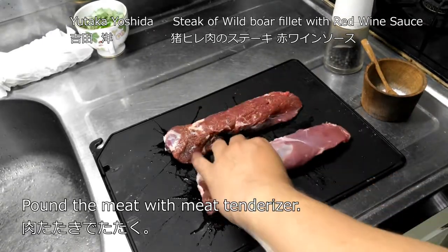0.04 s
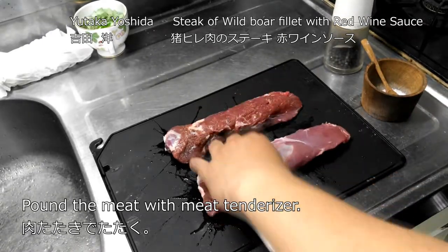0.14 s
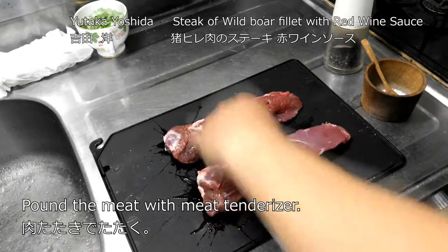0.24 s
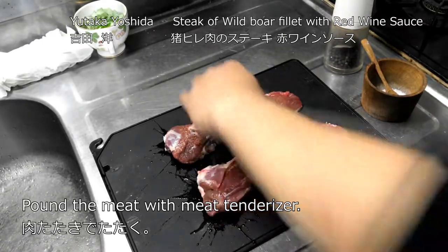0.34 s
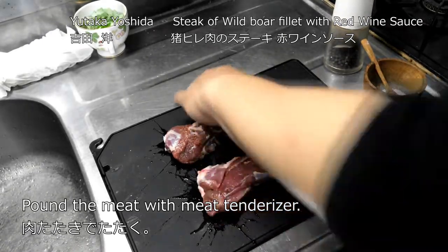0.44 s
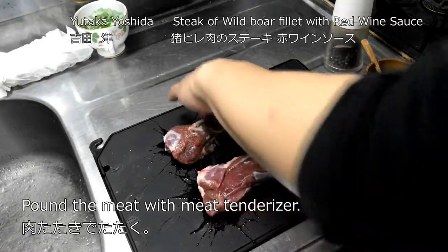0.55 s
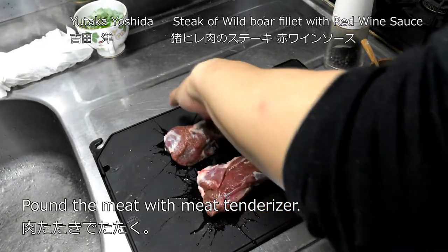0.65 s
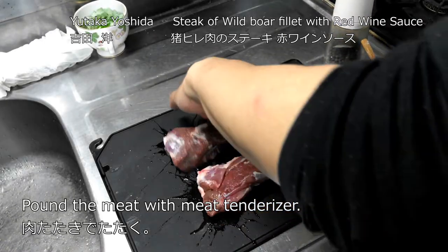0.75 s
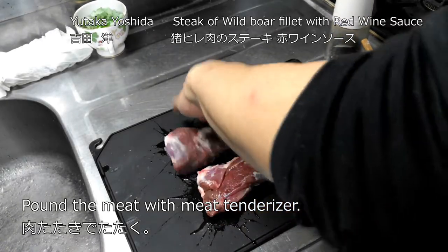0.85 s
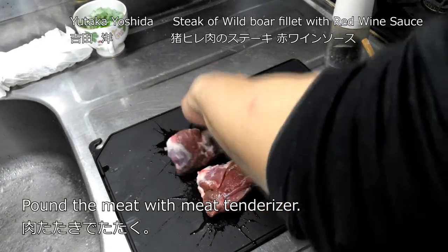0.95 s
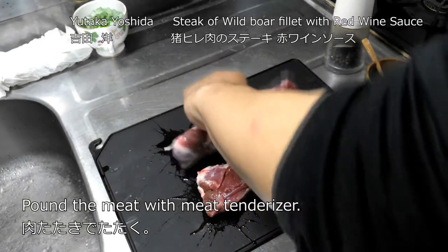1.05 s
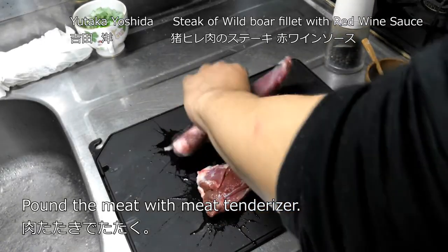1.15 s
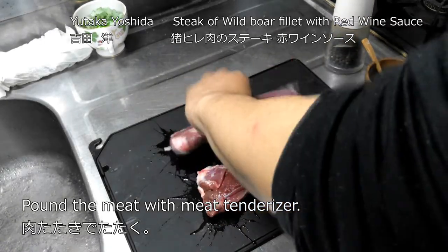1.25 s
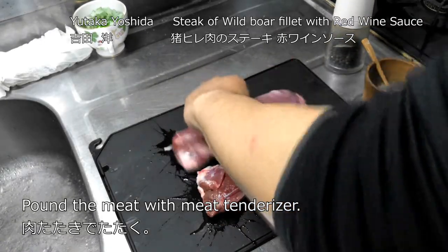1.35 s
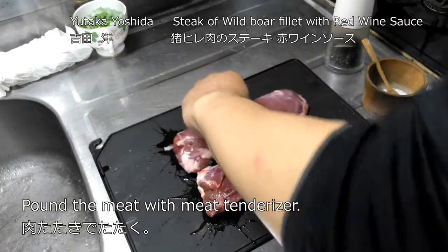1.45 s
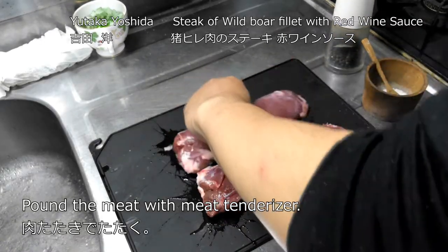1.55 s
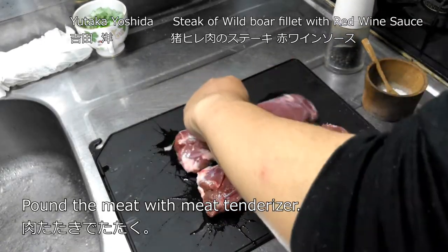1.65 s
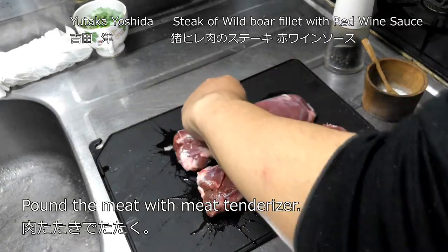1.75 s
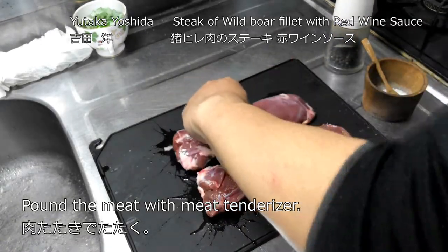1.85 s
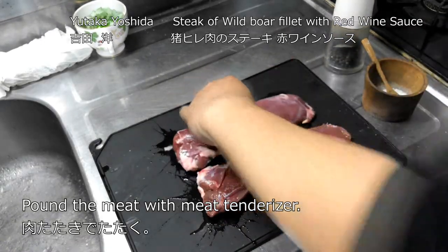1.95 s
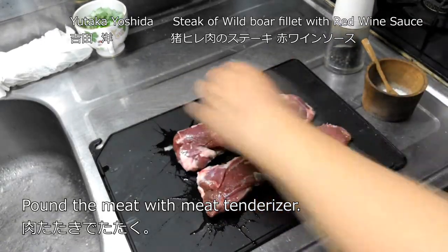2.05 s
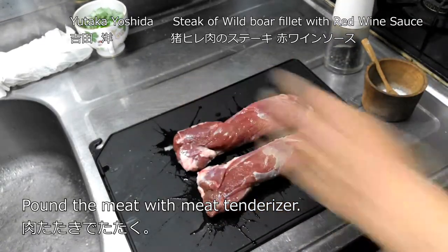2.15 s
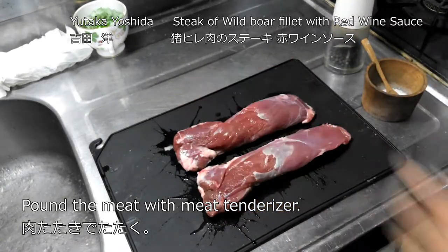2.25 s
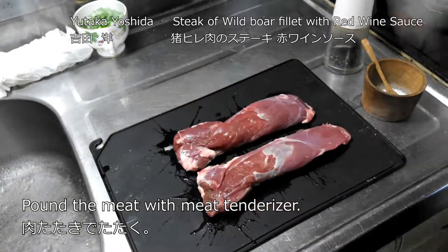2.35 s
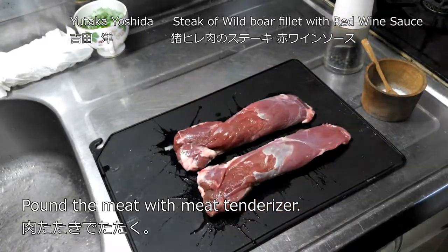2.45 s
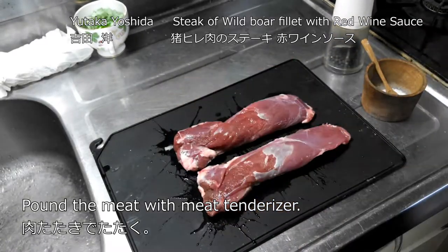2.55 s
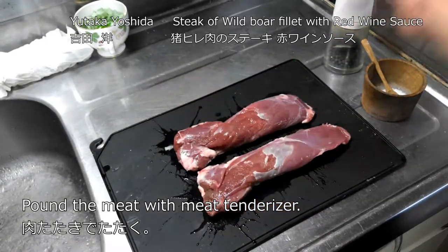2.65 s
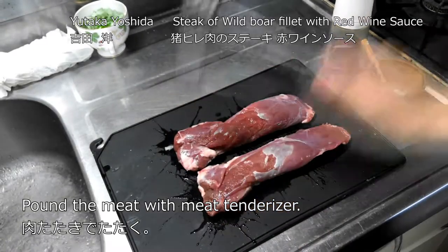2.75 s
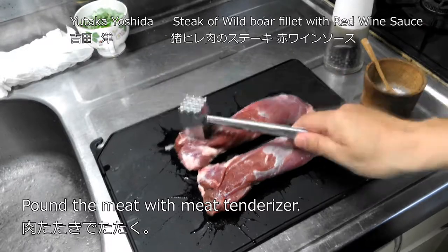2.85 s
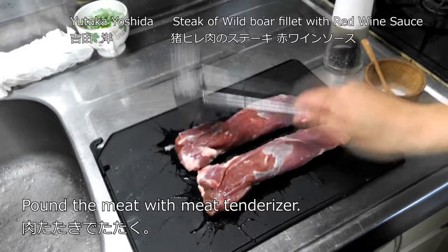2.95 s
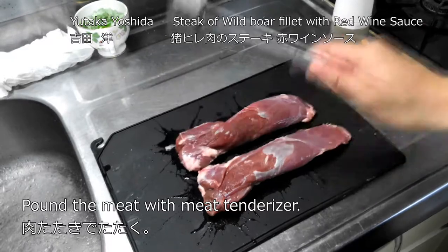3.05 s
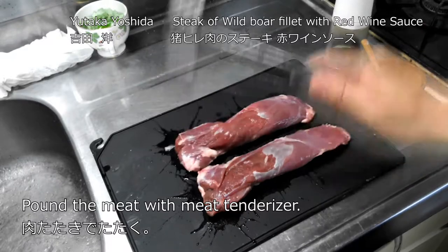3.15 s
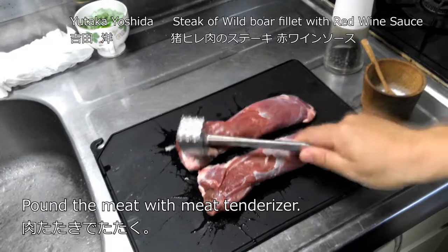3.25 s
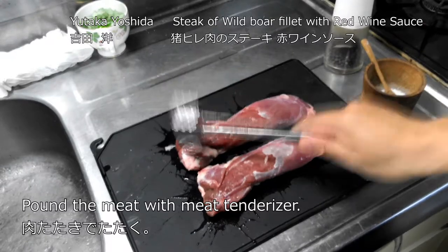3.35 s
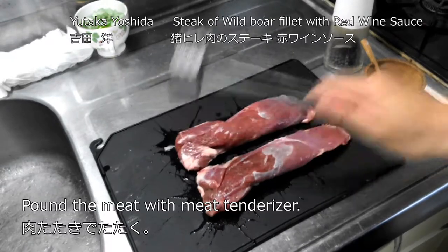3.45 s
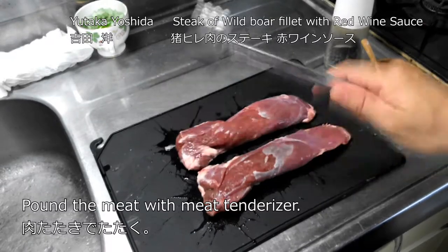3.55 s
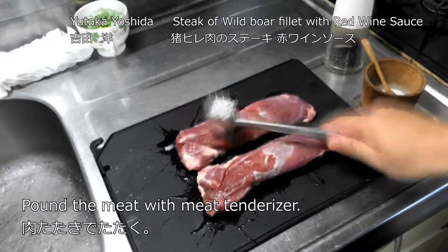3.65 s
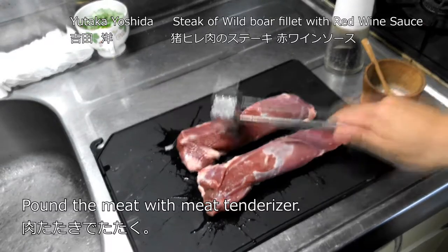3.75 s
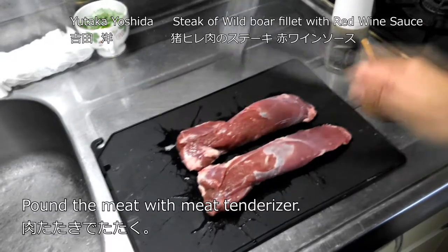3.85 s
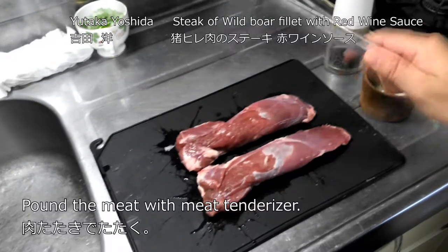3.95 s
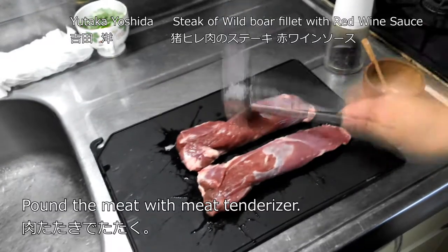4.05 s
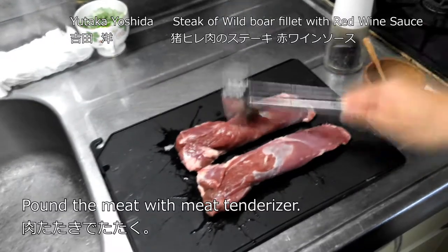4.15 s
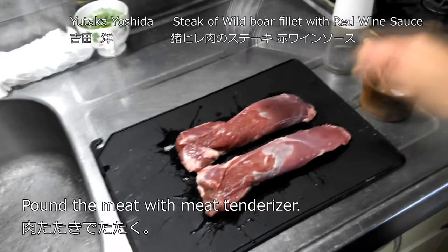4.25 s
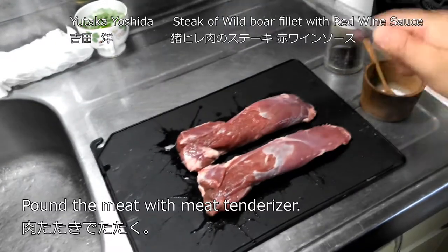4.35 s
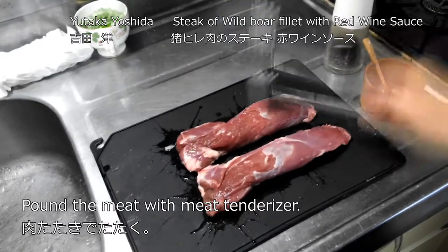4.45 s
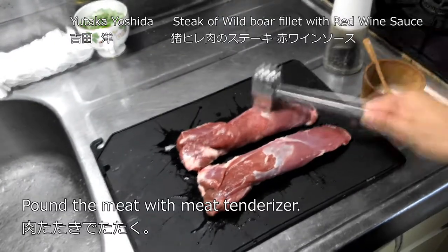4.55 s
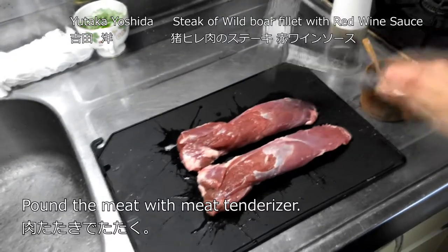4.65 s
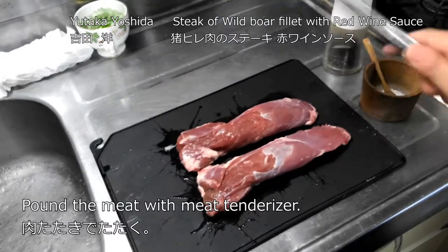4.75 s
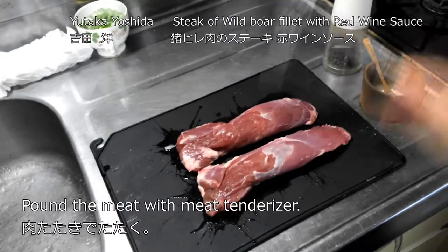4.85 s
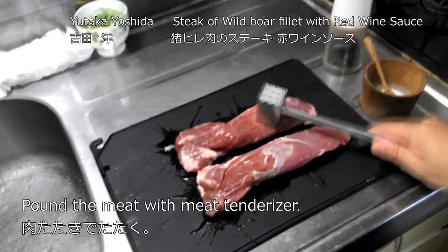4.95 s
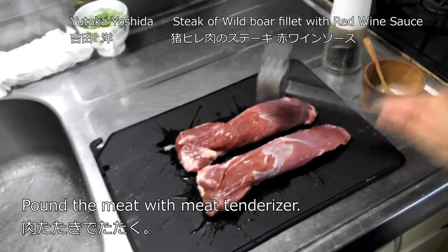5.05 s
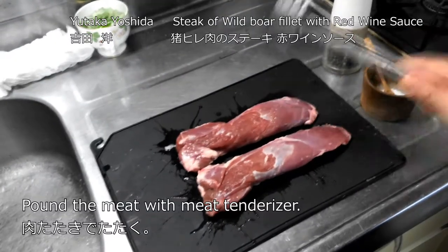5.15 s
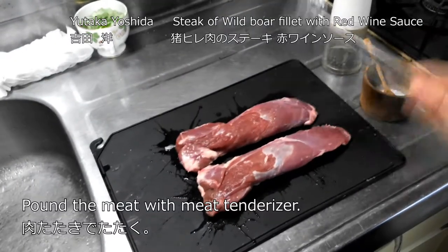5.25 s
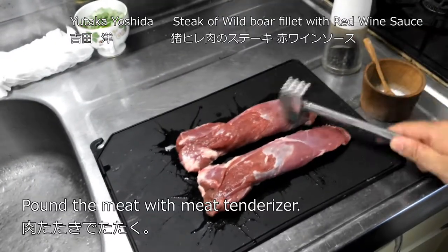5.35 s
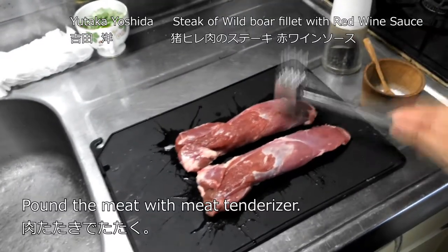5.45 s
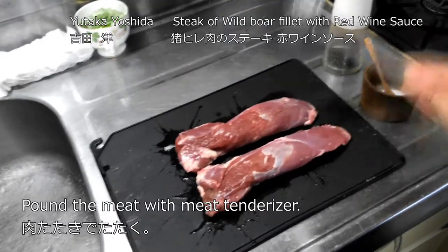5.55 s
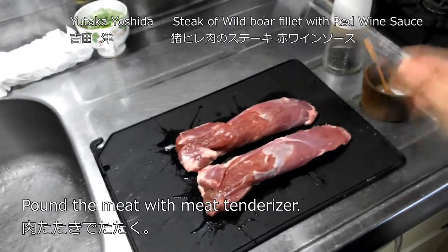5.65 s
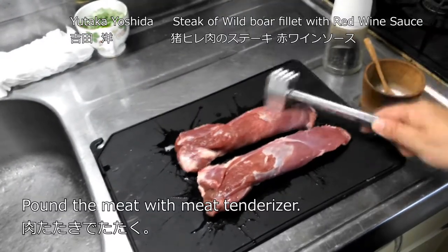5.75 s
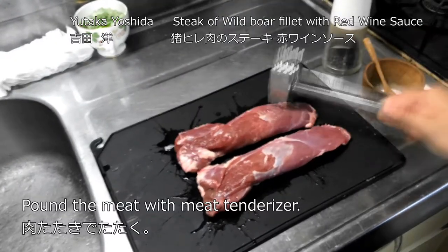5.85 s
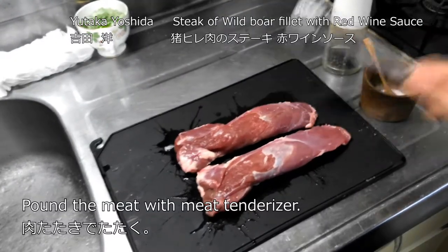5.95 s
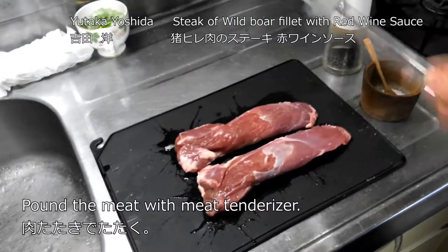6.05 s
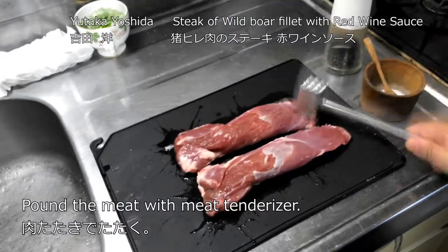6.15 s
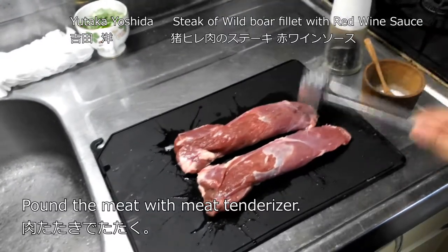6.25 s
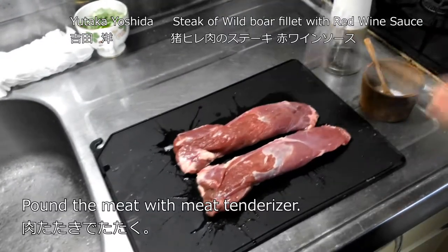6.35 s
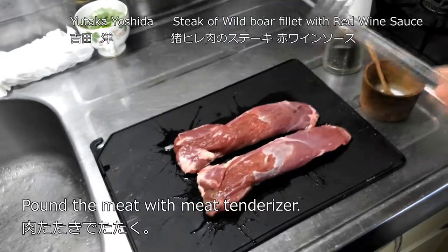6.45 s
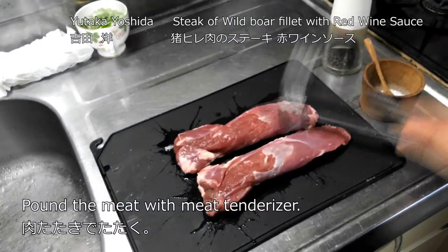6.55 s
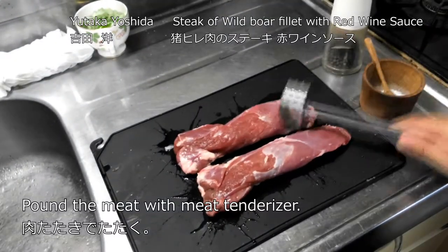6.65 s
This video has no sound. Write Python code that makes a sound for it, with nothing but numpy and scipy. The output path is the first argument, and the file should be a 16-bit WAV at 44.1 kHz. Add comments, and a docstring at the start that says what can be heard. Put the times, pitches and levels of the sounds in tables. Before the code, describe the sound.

Raw meat is shifted on a plastic cutting board with soft bumps and sticky ticks, and a metal tool clanks lightly twice. After a pause, a metal mallet pounds the meat ten times at a steady pace. Each wet smack booms through the steel counter and makes the board chatter, while the sink rings faintly. The kitchen echoes a little, a refrigerator hums and the microphone hisses softly.

```python
"""In a kitchen, a hand shifts two strips of raw meat on a plastic board and a metal tool clanks twice.
Then a metal mallet pounds the meat ten times. Each blow smacks the wet meat, booms in the steel
counter and makes the board jump and chatter on it, so the sink rings and something loose rattles.
The room echoes, a refrigerator hums and the microphone hisses."""
import sys
import numpy as np
from scipy import signal
from scipy.fft import rfft, irfft
from scipy.io import wavfile
from scipy.ndimage import uniform_filter1d

SR = 44100
rng = np.random.default_rng(int(sys.argv[2]) if len(sys.argv) > 2 else 0)


def store_wav(level_fs):
    """Save 16-bit WAV to argv[1]."""
    pcm = np.round(np.clip(np.atleast_2d(level_fs), -1, 1) * 32767)
    wavfile.write(sys.argv[1], SR, pcm.T.astype(np.int16))


N = 295911


def gain_of(db):
    return 10 ** (np.asarray(db) / 20)


def unit_rms(x):
    return x / np.sqrt(np.mean(x ** 2) + 1e-20)


def value_at(points, hz):
    point_hz, value = np.transpose(points)
    return np.interp(np.log(hz + 1), np.log(point_hz + 1), value)


def add(mix, start_s, sound):
    part = mix[max(round(start_s * SR), 0):][:len(sound)]
    part += sound[:len(part)]


def coloured(x, spectrum, tilt_db=0):
    """Gives noise a tone colour. Tilt is in dB per octave: more tilt sounds brighter."""
    hz = np.fft.rfftfreq(len(x), 1 / SR)
    curve_db = value_at(spectrum, hz) + tilt_db * np.log2((hz + 1) / 2000)
    return irfft(rfft(x) * unit_rms(gain_of(curve_db)), len(x))


def drift(rate_hz):
    """A slow random wobble, about 1 in size."""
    noise = uniform_filter1d(rng.standard_normal(N), size=200)
    return unit_rms(signal.lfilter([1], [1, -np.exp(-2 * np.pi * rate_hz / SR)], noise))


def faded(x, fade_times, after_s=0):
    """Fades each pitch at its own speed. A fade time (t60) is the time it takes to fall 60 dB."""
    hz, t, bands = signal.stft(x, SR, nperseg=256, noverlap=192)
    t60 = np.maximum(value_at(fade_times, hz), .02)[:, None]
    fall_db = -60 * np.maximum(t - after_s, 0) / t60
    return signal.istft(bands * gain_of(fall_db), SR, nperseg=256, noverlap=192)[1][:len(x)]


def clicks(events, width_octaves, decay_s):
    """Short bursts of noise, each around its own pitch; little gets through near 4 kHz."""
    out, t = np.zeros(N), np.arange(2048) / SR
    hz = np.fft.rfftfreq(len(t), 1 / SR) + 1
    dip = (1 - .8 * np.exp(-((hz - 4150) / 700) ** 2)) * (hz < 15800)
    envelope = np.minimum(t / .001, 1) * np.exp(-t / decay_s)
    for start_s, db, centre_hz in events:
        band = unit_rms(np.exp(-(np.log2(hz / centre_hz) / width_octaves) ** 2) * dip)
        burst = irfft(rfft(rng.standard_normal(len(t))) * band)
        add(out, start_s, gain_of(db) * burst * envelope)
    return out


# The tones of the refrigerator: (pitch [Hz], level [dB])
FRIDGE_TONES = [(59.2, -47.5), (118.4, -55.5), (156.1, -68), (220.7, -66), (317.6, -68)]
def fridge_hum():
    """The motor hums, wavering a little as its speed wanders."""
    motor_time = np.arange(N) / SR + .0003 * drift(1)
    return sum(gain_of(db + 1.9 * drift(1.4)) * np.sin(2 * np.pi * hz * motor_time)
               for hz, db in FRIDGE_TONES)


# The tone colour of the background noise: (pitch [Hz], level [dB])
AIR_SPECTRUM = [(30, -30), (55, -2), (85, -11.5), (170, -18.5), (336, -20.5), (500, -26.5), (1000, -32.5),
                (2000, -40.5), (4100, -51), (6300, -43), (9200, -42), (10400, -45.5), (11200, -41.5),
                (15700, -37.5), (15800, -76)]
def air_and_hiss():
    """Room air rumbles softly and the microphone hisses."""
    return gain_of(-57 + 0.98 * drift(2.4)) * coloured(rng.standard_normal(N), AIR_SPECTRUM)


# Faint high tones: (pitch [Hz], width [Hz], level [dB])
WHINE_BANDS = [(6363, 200, -89), (9740, 240, -79), (12750, 330, -81)]
def whines():
    """Narrow bands of noise sound like thin, fuzzy tones."""
    hz, noise = np.fft.rfftfreq(N, 1 / SR), rfft(rng.standard_normal(N))
    return sum(gain_of(db) * unit_rms(irfft(noise / (1 + (2 * (hz - centre) / width) ** 2), N))
               for centre, width, db in WHINE_BANDS)


# How long the room echoes: (pitch [Hz], fade time [s])
ROOM_FADE = [(200, 0.99), (1000, 0.75), (4000, 0.6), (12000, 0.28)]
def kitchen_echo(x):
    """The room sends back many small echoes, one in every 20 samples; the highs fade first."""
    echoes = np.zeros(30000)
    slots = np.arange(200, len(echoes) - 20, 20)
    echoes[slots + rng.integers(0, 20, slots.shape)] = rng.choice([-1., 1.], slots.shape)
    tail = faded(echoes, ROOM_FADE)
    return signal.oaconvolve(x, tail / np.linalg.norm(tail))[:N]


# The natural tones of the sink: (pitch [Hz], level [dB], fade time [s])
SINK_TONES = [(453, -63, 0.87), (556, -75, 1.4), (614, -61, 0.5), (716, -69, 1.46), (804, -64.5, 0.74),
              (874, -66, 0.51), (912, -73, 0.83), (996, -54.5, 0.23), (1160, -75.5, 1.1),
              (1360, -68.5, 0.56), (1490, -67, 0.28), (1736, -63.5, 0.54)]
def sink_ring(shaking):
    """The steel basin rings on when the chattering board shakes it."""
    t = np.arange(30000) / SR
    ring = sum(gain_of(db - 60 * t / t60) * np.sin(2 * np.pi * hz * t) for hz, db, t60 in SINK_TONES)
    return signal.oaconvolve(shaking, ring)[:N]


# Soft clicks between the blows: (time [s], level [dB])
LOOSE_RATTLES = [(3.569, -54), (3.6157, -51), (3.6553, -52), (3.6666, -51), (3.7005, -52), (4.844, -52),
                 (4.902, -53), (4.944, -55), (4.9796, -55), (5.2814, -49), (5.407, -55), (5.7548, -55),
                 (5.8022, -54), (6.531, -51), (6.6564, -56)]
def loose_rattles():
    """Something loose on the counter rattles as a blow dies away."""
    centre_hz = 2300
    return clicks([(s, db, centre_hz) for s, db in LOOSE_RATTLES], width_octaves=.85, decay_s=.006)


# The natural tones of a metal tool: (pitch [Hz], level [dB], fade time [s])
TOOL_TONES = [(342, 1.5, 0.16), (453, -7, 0.77), (586, -0.5, 0.1), (838, -3.5, 0.35), (1202, -2.5, 0.22),
              (1255, -1.5, 0.12), (1470, -3, 0.076)]
# The tool touches down: (time [s], level [dB])
TOOL_TOUCHES = [(0.999, -48), (1.027, -43)]
def tool_clanks():
    """The tool rings at each touch, its tones unsteady as it rocks."""
    out, t = np.zeros(N), np.arange(24000) / SR
    hz, level_db, t60 = np.transpose(TOOL_TONES)[:, :, None]
    tones = gain_of(level_db - 60 * t / t60) * np.sin(2 * np.pi * hz * t)
    for start_s, db in TOOL_TOUCHES:
        rocking = 1 + 0.35 * unit_rms(uniform_filter1d(rng.standard_normal(tones.shape), 600, axis=1))
        add(out, start_s, gain_of(db) * np.minimum(t / 0.0013, 1) * (rocking * tones).sum(0))
    return out


# Small clicks: (time [s], level [dB], pitch [Hz])
SMALL_CLICKS = [(0.0588, -55, 12100), (0.1695, -54.5, 5900), (0.7652, -51.5, 9350), (0.818, -42, 10500),
                (0.9267, -46.5, 5300), (0.9936, -28.5, 8300), (1.27, -52, 8680), (1.354, -44, 3500),
                (1.712, -54, 12800), (1.8457, -55, 14800), (1.9644, -56, 7500), (2.621, -60, 5870),
                (2.901, -54, 7000)]
def small_clicks():
    """Sticky meat ticks on board and fingers; the metal tool clicks sharply once as it touches down."""
    return clicks(SMALL_CLICKS, width_octaves=1, decay_s=0.0031)


# The tone colour of plastic hitting steel: (pitch [Hz], level [dB])
BOARD_SPECTRUM = [(71, -30), (120, -7), (271, -4), (340, -12), (520, -12.5), (880, -11.5), (1200, -13.5),
                  (2560, -18.5), (3300, -26), (4090, -35), (6020, -25.5), (10500, -33), (15700, -37),
                  (16000, -67.5)]
# How long the board buzzes: (pitch [Hz], fade time [s])
BUZZ_FADE = [(150, 0.76), (500, 0.64), (1500, 0.44), (4000, 0.47), (8000, 0.36), (15000, 0.26)]
# Extra fading once the board lies flat: (pitch [Hz], fade time [s])
FLAT_FADE = [(300, 0.35), (2500, 0.14), (6000, 0.23), (12000, .12)]
def board_chatter(db, tilt_db, landing_db, landing_s, flat_s):
    """The board jumps and buzzes on the steel, lands again and settles; loose things tremble on."""
    t = np.arange(24000) / SR
    rise = gain_of(db) * (1 - np.exp(-(t / 0.016) ** 2))
    jump = rise * (0.33 + 0.55 * np.exp(-(t / 0.04) ** 2))
    since_landing = np.maximum(t - landing_s, 0)
    landing = gain_of(landing_db) * (1 - np.exp(-(since_landing / 0.0034) ** 2))
    strengths = gain_of(5 * np.minimum(rng.exponential(1, len(t)), 3))
    contacts = strengths * (rng.random(len(t)) < 150 / SR)  # about 150 tiny hits a second
    roughness = 1.017 + .5 * unit_rms(signal.lfilter([1], [1, -np.exp(-1 / (0.0038 * SR))], contacts))
    buzz = (jump + landing) * coloured(roughness * rng.standard_normal(len(t)), BOARD_SPECTRUM, tilt_db)
    trembling = rise * gain_of(-33 - 60 * t / 5) * np.hanning(2 * len(t))[len(t):]
    loose_things = coloured(roughness * rng.standard_normal(len(t)), BOARD_SPECTRUM, tilt_db=-0.13)
    return faded(faded(buzz, BUZZ_FADE), FLAT_FADE, flat_s) + trembling * loose_things


def board_knock(db, tilt_db):
    """The board hits the steel once: a quick burst with the board's colour, minus its bass."""
    t = np.arange(2048) / SR
    burst = coloured(rng.standard_normal(len(t)), [(150, -63)] + BOARD_SPECTRUM[3:], tilt_db)
    envelope = np.minimum(t / 0.00062, 1) * (np.exp(-t / 0.0012) + 0.34 * np.exp(-t / 0.019))
    return gain_of(db) * burst * envelope


# Single knocks of the board: (time [s], level [dB], tilt [dB per octave])
STRAY_KNOCKS = [(1.2808, -34, -0.5), (1.365, -23, -2.5), (3.034, -27, 4.5), (4.2457, -24.5, 0.5),
                (4.2976, -24, -2.5), (4.6905, -28, 2.5), (5.5183, -25.5, 3.5), (5.9354, -20, 1.5),
                (6.3104, -37, 15), (6.3485, -25.5, 4.5)]
def stray_knocks():
    """Now and then the board knocks on the steel once more after a bump or a blow."""
    out = np.zeros(N)
    for start_s, db, tilt_db in STRAY_KNOCKS:
        add(out, start_s, board_knock(db, tilt_db))
    return out


def board_thud(hz, db):
    """The board gives a short hollow tone; its pitch depends on where the mallet lands."""
    t = np.arange(12000) / SR
    rise_s, t60 = 0.007, 0.069
    return gain_of(db - 60 * t / t60) * np.minimum(t / rise_s, 1) * np.sin(2 * np.pi * hz * t)


# The natural tones of the counter: (pitch [Hz], level [dB], fade time [s], starting direction [+1 or -1])
COUNTER_TONES = [(47, -23, 1.01, 1), (54.4, -11.5, 0.2, 1), (68.1, -9, 0.18, -1), (77.1, -17, 0.086, -1),
                 (96.45, -19.5, 0.43, -1), (127.9, -23, 0.42, -1), (145.4, -22.5, 0.6, 1),
                 (165.1, -17, 0.41, -1), (190.2, -17.5, 0.07, 1), (229, -36, 1.64, 1),
                 (245.6, -26, 0.57, 1), (257.4, -23.5, 0.22, -1), (284, -11, 0.033, -1),
                 (354, -30, 0.386, -1)]
def counter_boom(db, tilt_db, landing_s):
    """A short push, cushioned by the meat, rings the steel counter; each hit lands on another spot."""
    out, t = np.zeros(24000), np.arange(24000) / SR
    hz, level_db, t60, direction = np.transpose(COUNTER_TONES)[:, :, None]
    spot_level, spot_pitch, spot_landing = rng.standard_normal((3, len(COUNTER_TONES), 1))
    octaves = np.log2(hz / 64)
    envelopes = gain_of(level_db + tilt_db * octaves + 1.5 * spot_level - 60 * t / t60)
    tones = np.sign(direction) * envelopes * np.sin(2 * np.pi * hz * (1 + 0.0079 * spot_pitch) * t)
    add(out, .0061, tones.sum(0))  # the meat squashes before the counter moves
    landing = gain_of(-12.5 + 4.1 * octaves) * spot_landing * tones
    add(out, landing_s, landing.sum(0))  # the light board lands and wakes the higher tones
    push = np.hanning(round(0.0022 * SR))
    out = np.convolve(out, push / push.sum())
    add(out, .002, gain_of(-16.5) * np.hanning(round(0.0051 * SR)))  # a puff of squeezed-out air
    return gain_of(db) * out


# Soft bumps on the board: (time [s], boom level [dB], boom tilt [dB per octave],
# chatter level [dB], chatter tilt [dB per octave], time until the board lies flat [s])
SOFT_BUMPS = [(0, -26.5, -3.5, -55.5, 2.5, 0.016), (0.16, -35.5, 4, -47, -3, 0.067),
              (.994, -60, -1, -45.5, 2, 0.058), (1.273, -30, -10, -41.5, -1.3, 0.052),
              (1.335, -27, -2, -34.5, -2, 0.027), (1.355, -18.5, 0.3, -28, -2.5, 0.056)]
def soft_bumps():
    """Meat set down booms and chatters softly; a brief chatter also comes as the tool touches down."""
    booms, buzz = np.zeros((2, N))
    landing_s = 0.0253
    for start_s, boom_db, boom_tilt, buzz_db, buzz_tilt, flat_s in SOFT_BUMPS:
        add(booms, start_s, counter_boom(boom_db, boom_tilt, landing_s))
        add(buzz, start_s, board_chatter(buzz_db, buzz_tilt, buzz_db - 19, landing_s, flat_s))
    return booms, buzz


# The tone colour of a wet smack: (pitch [Hz], level [dB])
SMACK_SPECTRUM = [(290, -51.5), (500, -4.5), (3760, -16.5), (6570, -2), (9490, 4.5), (10500, -1),
                  (12600, 6), (13700, 3), (15700, 4.5), (16800, -23.5)]
def meat_smack(db):
    """The mallet slaps the wet meat: two milliseconds of bright noise and a short spray."""
    t = np.arange(2048) / SR
    slap, spray = np.exp(-(t / 0.0016) ** 2), gain_of(-15 - 60 * t / 0.045)
    envelope = np.minimum(t / 0.0016, 1) ** 2 * (slap + spray)
    return gain_of(db) * envelope * coloured(rng.standard_normal(len(t)), SMACK_SPECTRUM)


# The ten blows: (time [s], smack level [dB], boom level [dB], boom tilt [dB per octave],
# board slap delay [s], slap level [dB], second landing delay [s], landing level [dB],
# thud pitch [Hz], thud level [dB])
MALLET_BLOWS = [(2.9239, -3.5, -0.5, 0.2, 0.02, -15.5, 0.048, -22.5, 220, -11),
                (3.343, -6.5, -1.2, -1.2, .014, -21.5, 0.054, -28, 209, -5),
                (3.7566, -6, -1, 1, 0.018, -17.5, .056, -26.5, 226, -14),
                (4.1725, -4, 0.2, 0.1, .0165, -19, .055, -26.5, 226, -11.5),
                (4.586, -10, 1.7, -0.6, 0.025, -27, 0.062, -23, 228, -14),
                (5.021, -6, -1, 1.1, 0.021, -35, .06, -22, 222, -12),
                (5.4448, -5, -0.5, 0, 0.021, -20, .05, -25.5, 230, -13),
                (5.8448, -5, -0.7, 1.2, 0.012, -33, .056, -23.5, 225, -17),
                (6.2634, -15.5, -0.1, -0.1, 0.01, -11, 0.057, -22, 224, -13),
                (6.6893, -9.5, 0.7, -4, 0.011, -13.5, .06, -18, 226, -20)]
def mallet_blows():
    """Each blow smacks, thuds and booms; the board slaps down, lands again and chatters."""
    low, smacks, knocks, chatter = np.zeros((4, N))
    for (start_s, smack_db, boom_db, boom_tilt, slap_s, slap_db,
         landing_s, landing_db, thud_hz, thud_db) in MALLET_BLOWS:
        add(smacks, start_s, meat_smack(smack_db))
        add(low, start_s + .0035, board_thud(thud_hz, thud_db))
        add(low, start_s, counter_boom(boom_db, boom_tilt, landing_s))
        harder_db = landing_db + 21  # a harder landing buzzes brighter and longer
        buzz_tilt, flat_s = 0.72 + 0.1 * harder_db, 0.16 + .007 * harder_db
        add(chatter, start_s, board_chatter(-17.5, buzz_tilt, landing_db, landing_s, flat_s))
        add(knocks, start_s + slap_s, board_knock(slap_db, tilt_db=2.5))
        add(knocks, start_s + landing_s, board_knock(landing_db + 1.5, tilt_db=3))
    return low, smacks, knocks, chatter


def scene():
    """Mixes low, buzzing and sharp sounds with their echo, the sink and the background."""
    blow_low, smacks, blow_knocks, blow_chatter = mallet_blows()
    bump_booms, bump_chatter = soft_bumps()
    buzz = blow_knocks + blow_chatter + bump_chatter + stray_knocks()
    low = blow_low + bump_booms + tool_clanks()
    sharp = smacks + small_clicks() + loose_rattles()
    echo = gain_of(-15) * kitchen_echo(buzz + gain_of(-8) * sharp + gain_of(-4.5) * low)
    sink = sink_ring(blow_chatter)  # only the mallet blows shake the basin
    background = fridge_hum() + air_and_hiss() + whines()
    return (low + buzz + sharp + echo + sink + background)[None]


def record(dry):
    """The small microphone drops the deepest bass; then the very highest treble is cut."""
    lowest_hz, highest_hz = 28, 17050
    thinned = signal.sosfilt(signal.butter(2, lowest_hz, "high", fs=SR, output="sos"), dry)
    treble_cut = signal.firwin(1023, highest_hz, window=("kaiser", 10), fs=SR)
    return signal.oaconvolve(thinned, treble_cut[None], "same")


dry = scene()
out = record(dry)
store_wav(out)
```